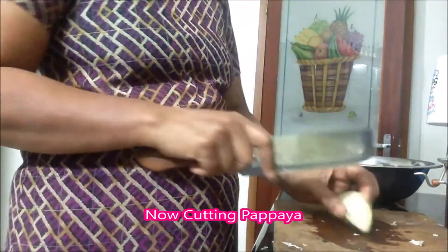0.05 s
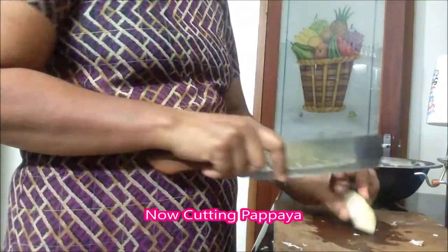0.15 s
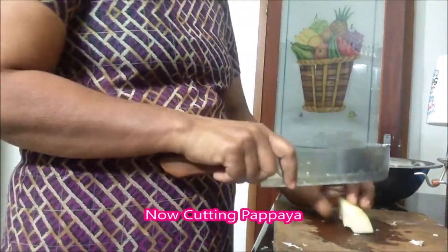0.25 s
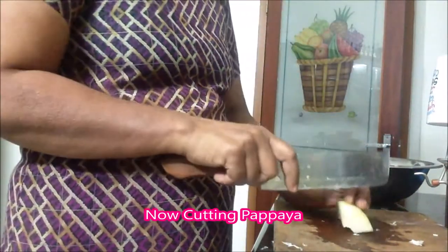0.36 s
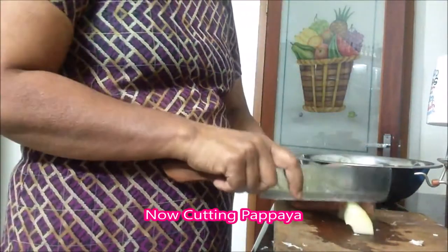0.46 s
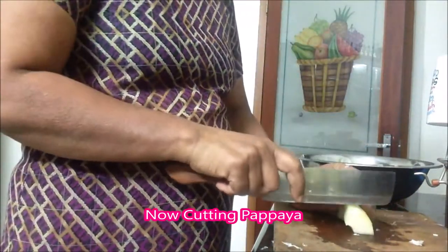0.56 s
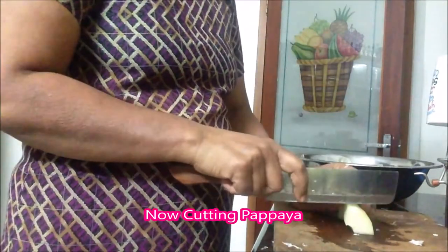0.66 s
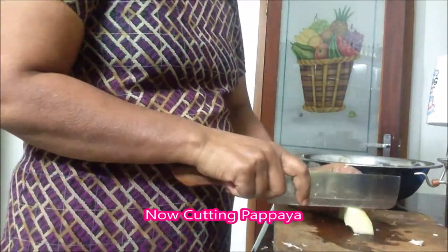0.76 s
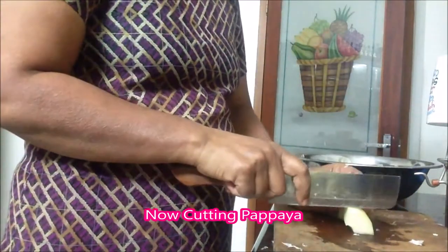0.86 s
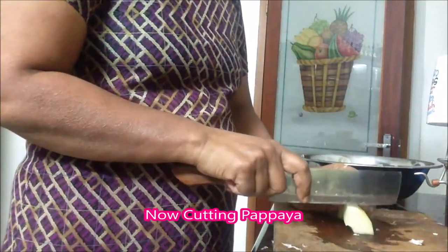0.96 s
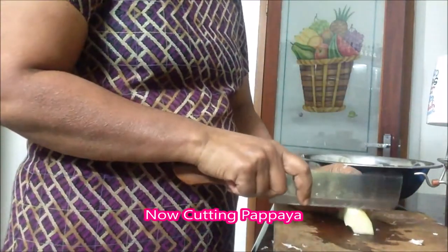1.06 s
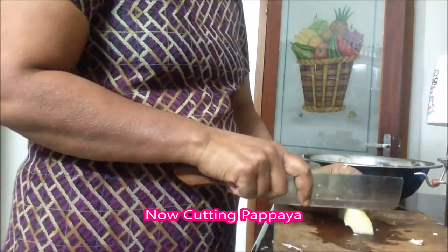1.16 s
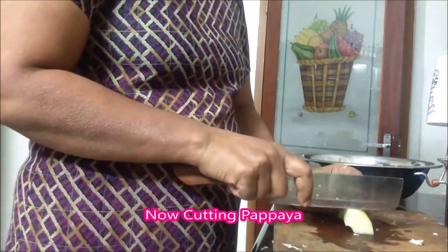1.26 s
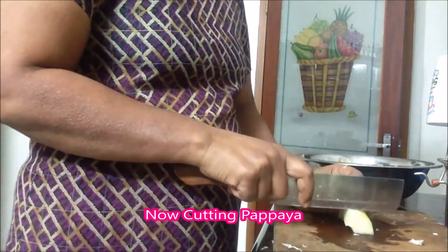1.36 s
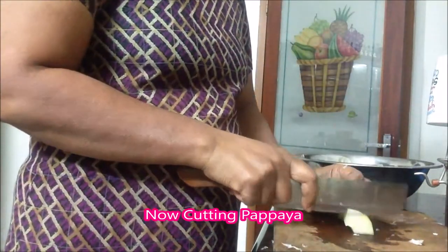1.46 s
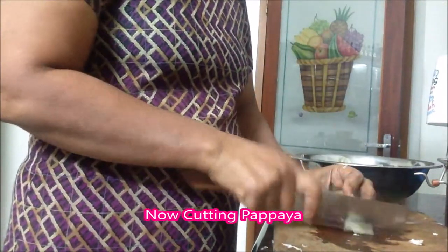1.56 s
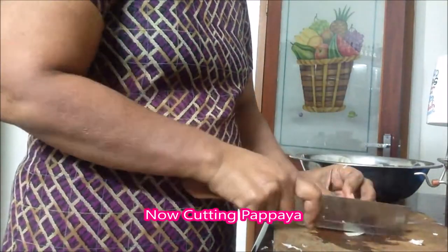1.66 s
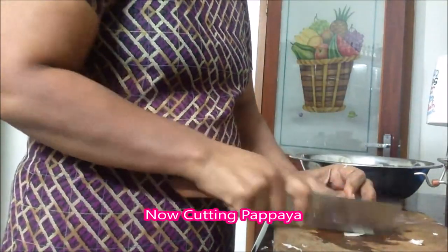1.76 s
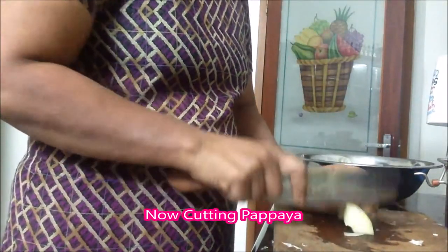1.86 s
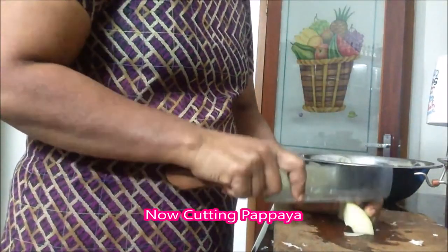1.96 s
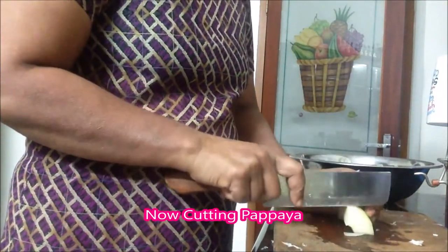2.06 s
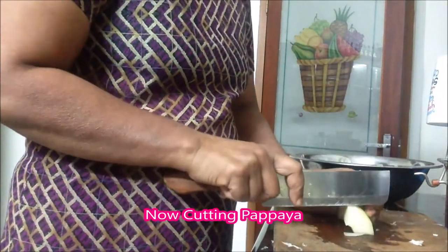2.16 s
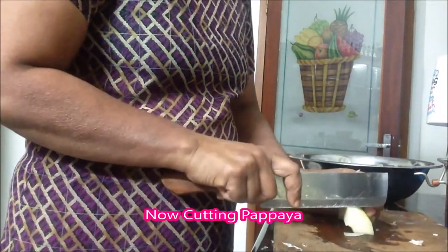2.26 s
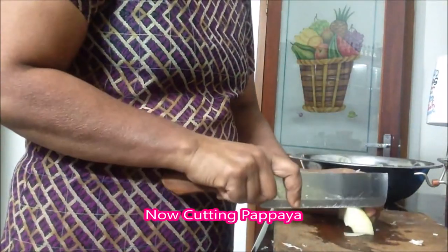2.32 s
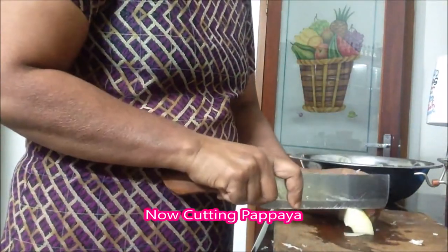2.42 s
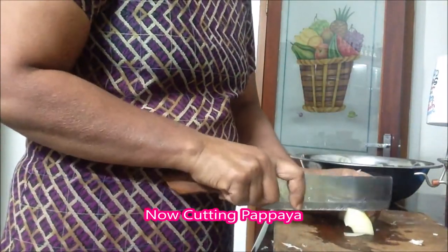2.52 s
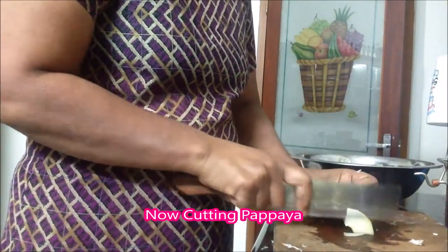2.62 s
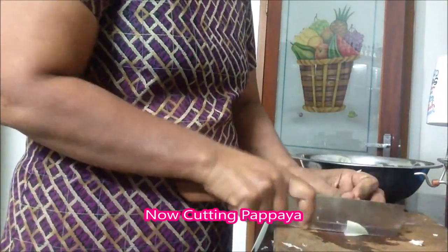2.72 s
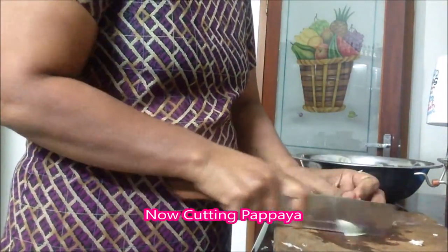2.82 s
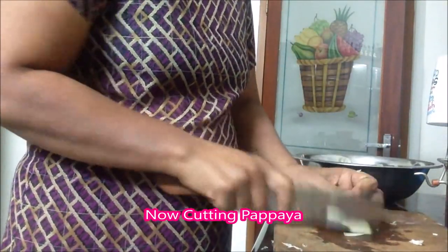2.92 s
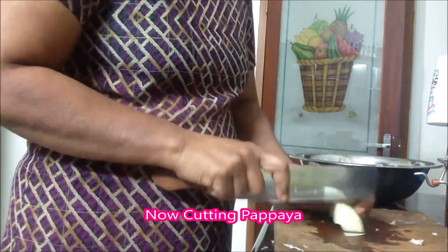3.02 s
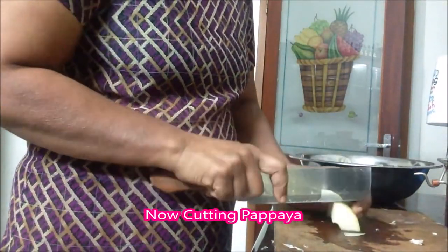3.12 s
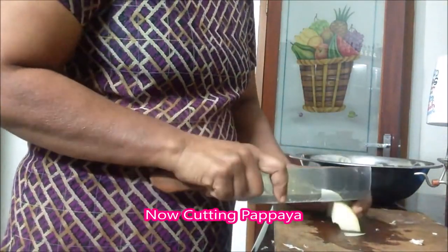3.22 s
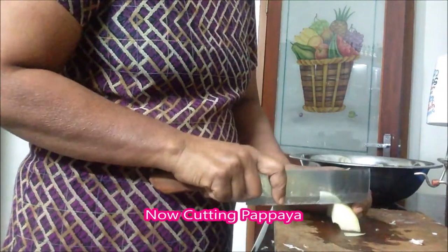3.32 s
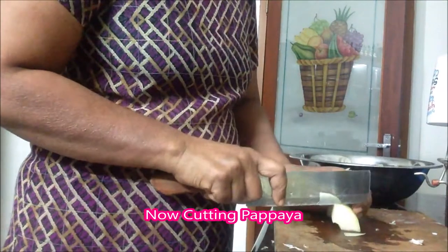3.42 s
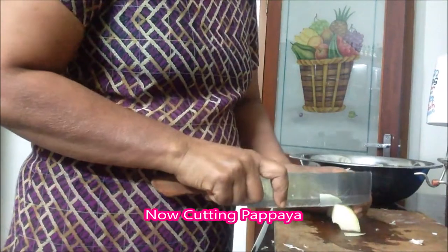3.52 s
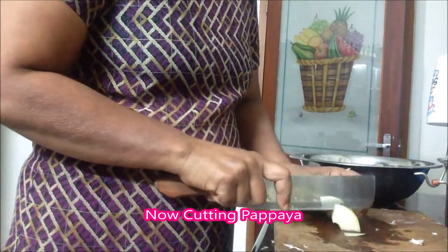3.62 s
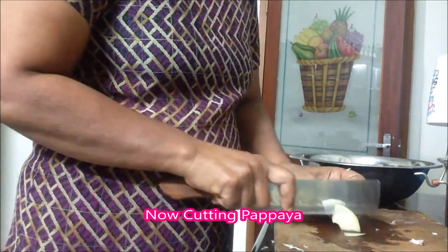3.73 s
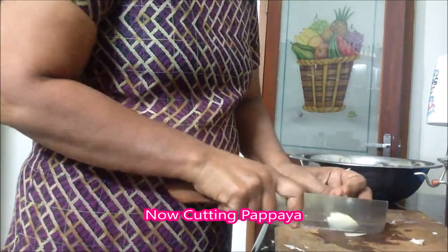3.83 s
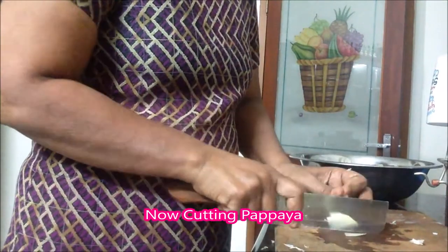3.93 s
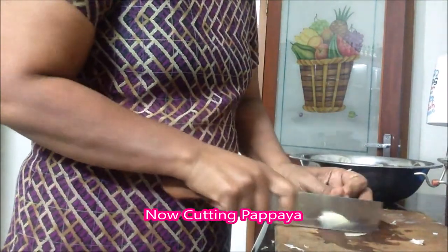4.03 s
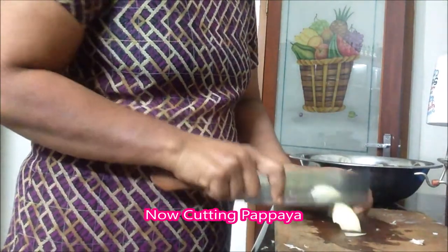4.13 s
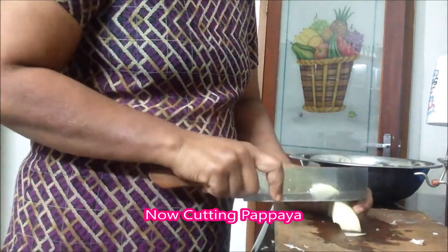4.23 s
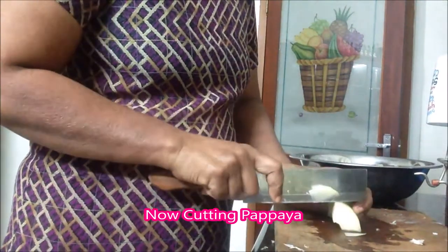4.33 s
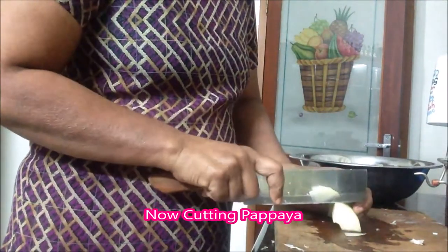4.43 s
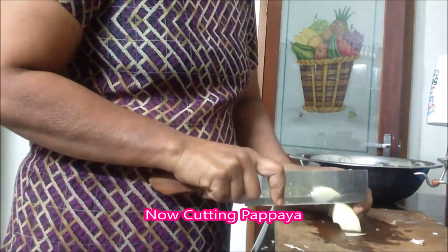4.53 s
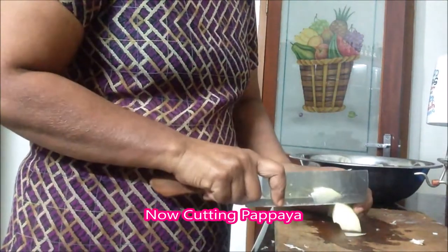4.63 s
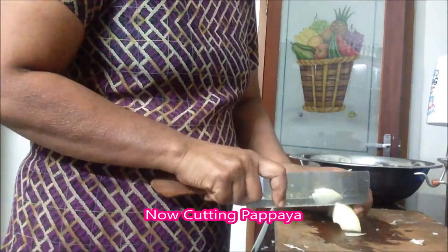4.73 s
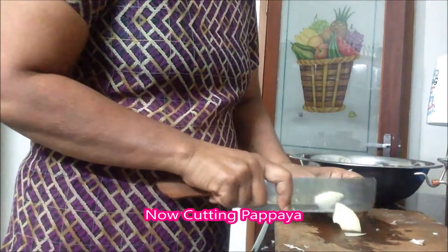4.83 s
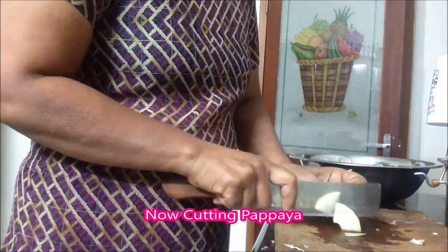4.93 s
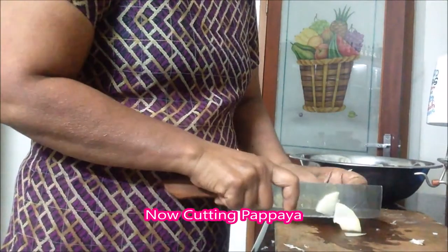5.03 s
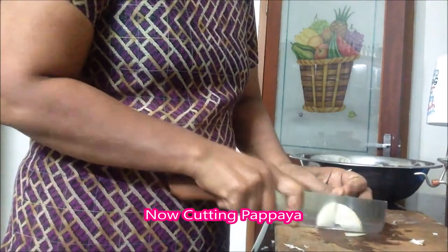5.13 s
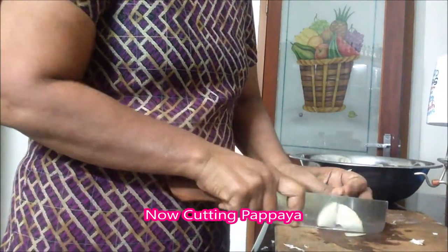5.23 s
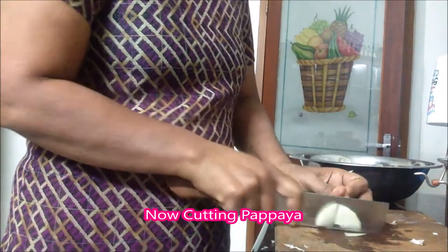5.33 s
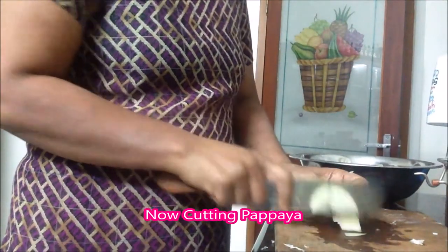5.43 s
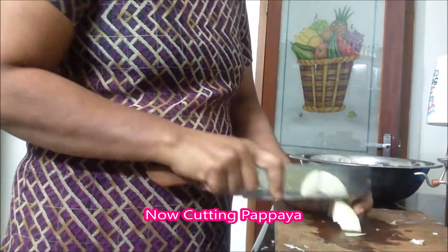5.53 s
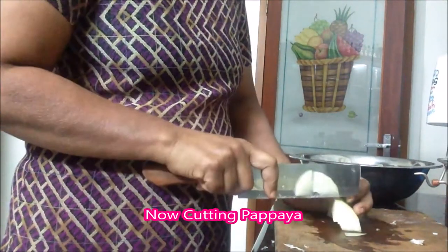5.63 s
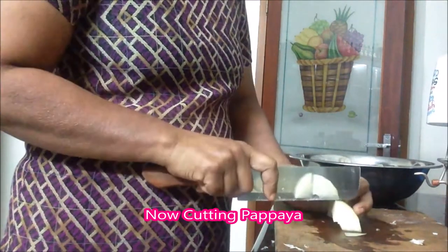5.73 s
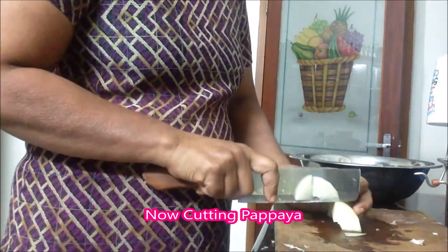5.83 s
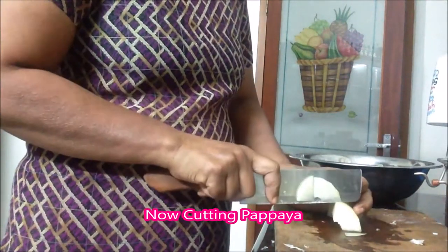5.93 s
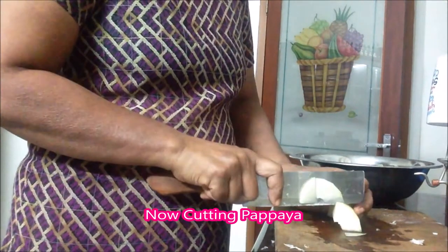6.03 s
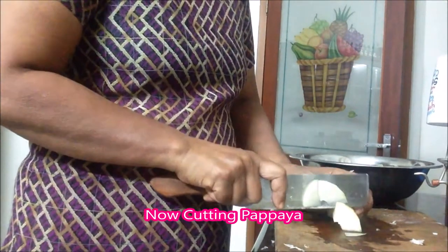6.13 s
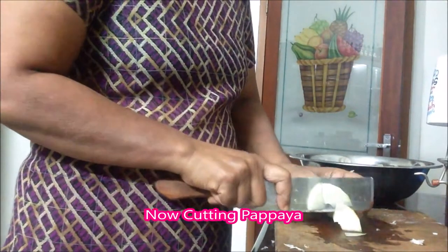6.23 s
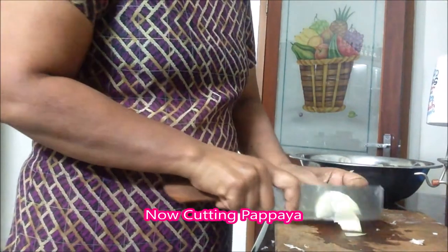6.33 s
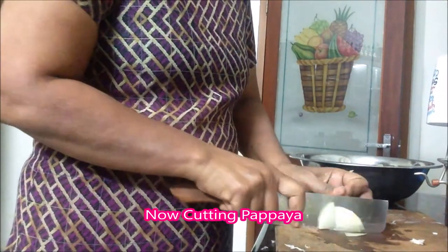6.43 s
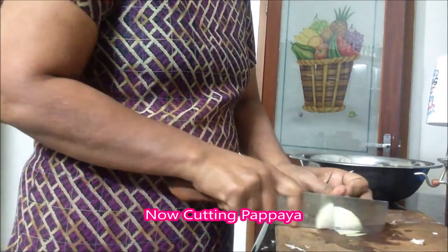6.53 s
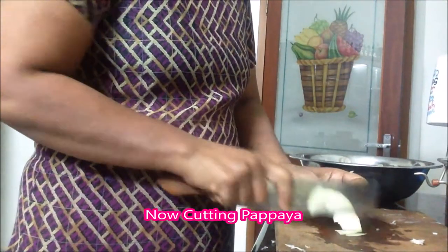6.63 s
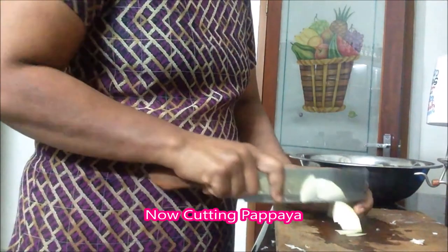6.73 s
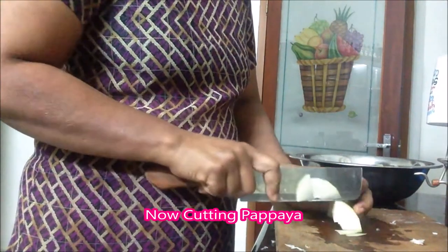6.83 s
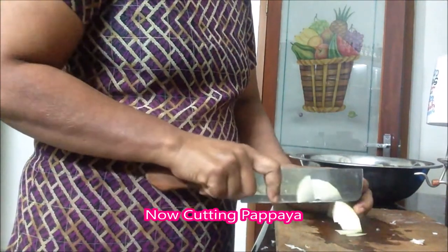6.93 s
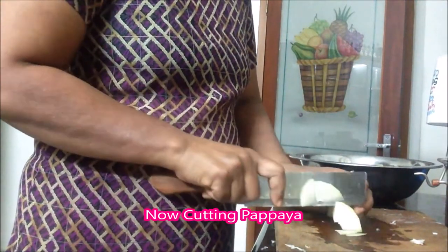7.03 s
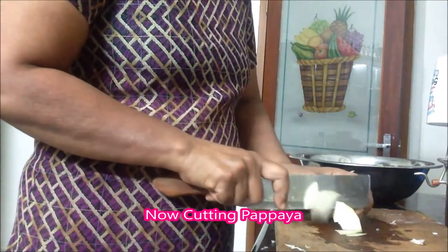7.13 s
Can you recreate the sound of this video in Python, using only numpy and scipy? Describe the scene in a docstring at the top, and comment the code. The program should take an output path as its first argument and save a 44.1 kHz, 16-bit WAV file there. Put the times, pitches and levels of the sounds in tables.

```python
"""A broad knife cuts slices off firm raw fruit on a wooden board in a hard-walled kitchen.
Each chop knocks the board in two quick touches, ringing its modes; the walls echo every knock alike.
Before it the blade hisses through the flesh: grainy, coloured noise that grows with depth.
Soft slides, light knocks and small wet ticks come between the chops.
A quiet room tone of shaped noise and a wavering low hum lie underneath."""
import sys
import numpy as np
from scipy import signal
from scipy.fft import rfft, irfft
from scipy.io import wavfile
from scipy.ndimage import uniform_filter1d

SR = 44100
rng = np.random.default_rng(int(sys.argv[2]) if len(sys.argv) > 2 else 0)


def master(y):
    """Save y as 16-bit WAV."""
    cut = np.clip(np.atleast_2d(y).T, -1, 1)
    pcm = np.round(cut * 32767)  # scale
    wavfile.write(sys.argv[1], SR, pcm.astype(np.int16))


N = 316197  # length in samples
HZ = np.fft.rfftfreq(N, 1 / SR) + 1  # the added 1 Hz keeps the logarithm finite

# The blade meets the board. Each row: full blow in seconds, level in dB, contact time in ms,
# lead of the first touch in ms, first touch in dB relative to the blow, then dB offsets of the
# thud, hollow, upper and top modes, and the crack in dB.
CHOPS = [(1.6618, -2, 0.05, 1.624, -14, -2.5, -1, -3, -2.5, -12.5),
         (2.7896, 1, 0.042, 1.262, -19, -3.5, -2.5, 3, 0.5, -11.5),
         (3.9247, 2, 0.027, 1.07, -14.5, -3.5, -5.5, 5, 3.5, -2.5),
         (5.2290, -5, 0.029, 1.886, 4.5, -2, -2, 5.5, 4.5, -9),
         (6.5024, 0.5, 0.034, 1.2, -22, -1, -3, 8, 8.5, -6.5)]


def undb(db):
    """Turn decibels into an amplitude factor."""
    return 10 ** (np.asarray(db) / 20)


def level(x, db):
    """Scale x to an RMS level in dB."""
    return x * undb(db) / np.sqrt(np.mean(x ** 2))


def add(track, s, sound):
    """Lay a short sound onto a track, starting at s seconds."""
    i = int(s * SR)
    track[i:i + len(sound)] += sound[:N - i]


def coloured(table, x):
    """Filter x by a curve through (Hz, dB) points, straight over log frequency."""
    hz, db = np.transpose(table)
    gain = undb(np.interp(np.log(HZ), np.log(hz), db))
    return irfft(rfft(x) * gain, N)


def walk(rate):
    """Random levels held 1 / rate seconds and smoothed twice; spread near 1."""
    k = int(SR / rate)
    steps = np.repeat(rng.standard_normal(N // k + 1), k)
    smooth = uniform_filter1d(uniform_filter1d(steps, k), k)
    return 1.5 * smooth[:N]


def scatter(spread_ms):
    """A click smeared in time: every narrow band arrives at its own moment, none louder than the rest."""
    hz = np.fft.rfftfreq(1024, 1 / SR)
    arrivals = rng.random(size=60)
    late_s = np.interp(hz, np.linspace(0, SR / 2, num=60), arrivals) * spread_ms / 1000
    # delay is the slope of phase over frequency
    phase = 2 * np.pi * np.cumsum(late_s) * hz[1]
    return irfft(np.exp(-1j * phase))


def knock(contact_ms, thud_db, hollow_db, upper_db, top_db):
    """One touch rings the board modes; a longer contact is duller. Peak 1."""
    # Modes of the wooden board. Each row: frequency in Hz, level in dB, 60 dB decay time in seconds.
    board_modes = [(208, -21.5, 0.045), (239, -16.5, 0.029), (529, -20, 0.027), (751, -16, 0.035),
                   (1053, -4.5, 0.023), (1305, -2.5, 0.015), (1625, 0, 0.0085), (2174, -3.5, 0.009),
                   (2534, 1.5, 0.012), (2661, 2, 0.008), (3106, -1, 0.0068), (3680, -8, 0.012),
                   (4230, -7.5, 0.0094), (4830, -6.5, 0.0083), (5370, -7.5, 0.0051), (6373, -9, 0.0058),
                   (7530, -11, 0.0039), (8300, -19, .0025)]
    thud_hz, hollow_hz, body_hz, upper_hz = 650, 1200, 1900, 4000  # upper edges of the mode groups
    t = np.arange(4096) / SR
    hz, db, t60 = np.transpose(board_modes)[:, :, None]
    # where the blade lands decides which groups of modes speak
    groups = [hz < thud_hz, hz < hollow_hz, hz < body_hz, hz < upper_hz]
    db = db + np.select(groups, [thud_db, hollow_db, 0, upper_db], top_db)
    signs = (-1) ** np.arange(len(board_modes))[:, None]
    decay = np.exp(-np.log(1000) * t / t60)
    ring = np.sum(signs * undb(db) * np.sin(2 * np.pi * hz * t) * decay, axis=0)
    push = t * np.exp(-1000 * t / contact_ms)
    out = signal.fftconvolve(ring, push)[:len(t)]
    return out / np.abs(out).max()


def board():
    """Chops of two touches with a short crack of the last fibres, then the light knocks and a set-down."""
    # The flesh gives way with a light knock. Each row: time in seconds, level in dB, brightness in dB.
    gives = [(1.651, -45, -5), (2.766, -38, 2), (2.777, -40, 3.5), (3.9012, -35, 6.5), (5.2040, -29.5, 6.5),
             (6.478, -39.5, 9)]
    give_contact_ms = 0.065
    roll_hz, roll_ms, roll_db = 3950, 2.419, 0.5  # modes above roll_hz are smeared over roll_ms
    crack_ms = 6.5
    margin = 96  # samples of silence around a knock, for the two-way filter
    out = np.zeros(N)
    fibres = signal.butter(1, [4200, 11000], "band", fs=SR, output="sos")
    split = signal.butter(6, roll_hz, fs=SR, output="sos")
    for s, db, contact_ms, lead_ms, first_db, *groups_db, crack_db in CHOPS:
        first_s = s - lead_ms / 1000
        whole = np.pad(knock(contact_ms, *groups_db), margin)
        blow = signal.sosfiltfilt(split, whole)
        add(out, s - margin / SR, undb(db) * blow)
        add(out, first_s - margin / SR, undb(db + first_db) * blow)
        # the edge rolls down along its length: the high modes are set off one after another,
        # not in two clean touches
        both = np.hypot(1, undb(first_db))
        rolled = signal.fftconvolve(whole - blow, scatter(roll_ms))
        add(out, first_s - margin / SR, undb(db + roll_db) * both * rolled)
        crack = signal.sosfilt(fibres, scatter(crack_ms))
        add(out, first_s, undb(crack_db) * crack)
    for s, db, bright_db in gives:
        light = knock(give_contact_ms, -bright_db, -bright_db / 2, bright_db, bright_db)
        add(out, s, undb(db) * light)
    # one dull set-down: long contact, strong thud modes
    set_down = knock(contact_ms=1.0, thud_db=20, hollow_db=0, upper_db=0, top_db=0)
    add(out, 0.2732, undb(-37.5) * set_down)
    # the knocks carry no deep bass
    return signal.sosfilt(signal.butter(2, 130, "high", fs=SR, output="sos"), out)


def strokes(t):
    """Gain and brightness of every cut, louder with depth until the last tear, and of every slide."""
    # The blade goes through the flesh, one cut per chop. Each row: start in seconds, level at the
    # end in dB, rise in dB, brightness in dB, last tear in dB, lead of the tear on the chop in ms.
    cuts = [(1.575, -55, 17, -5, -55, 14), (2.60, -54, 18, -1.5, -53, 11),
            (3.77, -52, 16.5, -2, -44.5, 8.8), (5.205, -42.5, 5, -2.5, -41.5, 4),
            (6.33, -50.5, 15, 4, -39.5, 9.5)]
    # Blade and fingers slide over the wet flesh. Each row: start in seconds, hold in seconds,
    # level in dB, brightness in dB.
    slides = [(.11, .1, -76, -7), (0.69, 0.23, -72.5, 11), (1.504, 0.04, -69.5, 3), (3.42, 0.18, -73.5, 2),
              (3.72, 0.025, -72.5, -7), (4.868, 0.094, -60.5, -3.5), (5.897, .2, -79.5, -1.5),
              (6.16, 0.12, -65.5, 2.5), (7.115, .1, -61, 14)]
    tear_rise_ms, tear_fall_ms = 5.4, 2
    entry_db_s, attack_db_s, release_db_s = 900, 497.5, 139  # slopes in dB per second
    for (start, db, rise_db, bright_db, tear_db, lead_ms), (chop, *_) in zip(cuts, CHOPS):
        ms = 1000 * (t - chop) + lead_ms  # time from the tear
        stop = np.exp(-(np.maximum(ms, 0) / tear_fall_ms) ** 2)
        # louder the deeper the blade goes, then the last flesh tears at once
        depth = np.clip((t - start) / (chop - lead_ms / 1000 - start), 0, 1)
        entry_db = entry_db_s * np.maximum(start - t, 0)
        press = undb(db - rise_db * (1 - depth) - entry_db)
        tear = undb(tear_db) * np.exp(np.minimum(ms, 0) / tear_rise_ms)
        yield stop * (press + tear), bright_db
    for start, hold, db, bright_db in slides:
        before_db = attack_db_s * np.maximum(start - t, 0)
        after_db = release_db_s * np.maximum(t - start - hold, 0)
        yield undb(db - before_db - after_db), bright_db


def rubbing():
    """Grainy hiss of tearing cells; a brighter stroke carries less of the low part."""
    # Colour of the hiss. Each row: frequency in Hz, level in dB.
    rub_colour = [(500, -6), (1200, -1), (2500, -2), (4500, -2), (6500, -8.5), (7700, -2), (9500, -9),
                  (13500, -4), (16000, -8.5)]
    noise = rng.standard_normal(N)
    grain_db = 1.8 * rng.exponential(size=N) + 1.1 * walk(60) + 1.7 * walk(14)
    hiss = level(coloured(rub_colour, noise * undb(grain_db)), 0.1)
    low = signal.sosfilt(signal.butter(1, 4000, fs=SR, output="sos"), hiss)
    high = hiss - low
    out = np.zeros(N)
    for gain, bright_db in strokes(np.arange(N) / SR):
        out += gain * (low * undb(-bright_db) + high)
    return out


def ticks():
    """Each small wet tick is a sine burst that dies within a few cycles."""
    # Each row: time in seconds, level in dB before the decay, pitch in Hz.
    wet_ticks = [(.276, -47, 9000), (0.806, -41, 8200), (2.1222, -46, 9000), (3.7205, -54, 9000),
                 (5.833, -53, 13000), (5.906, -52, 9000)]
    out = np.zeros(N)
    t = np.arange(200) / SR
    for s, db, hz in wet_ticks:
        burst = np.sin(2 * np.pi * hz * t) * np.exp(-t * hz / 0.81)
        add(out, s, undb(db) * burst)
    return out


def kitchen():
    """Echo pattern of the room: direct path, single echoes, then a dense tail that dies band by band."""
    # Decay between the hard walls. Each row: frequency in Hz, 60 dB decay time in seconds.
    walls = [(150, 0.1), (400, 0.48), (1040, 0.63), (2760, 0.52), (5000, 0.47), (8000, 0.44), (13000, 0.26)]
    # Room modes that ring above the rest of the tail. Each row: frequency in Hz, level in dB,
    # 60 dB decay time in seconds.
    rings = [(1066, -56, .65), (1155, -55, .65), (1245, -53, .65), (1331, -51, .65), (1547, -48, .65),
             (2417, -48, .6), (2596, -52, .6), (2815, -52, .6), (3125, -55, .55)]
    # First echoes from near surfaces. Each row: delay in ms, level in dB.
    first_echoes = [(4.8, -8.5), (10.2, -5), (14.7, -8.5), (21, -9), (27.5, -13), (31, -12.5)]
    wall_db, build_up_s = 1.5, 0.013
    late_db, late_stretch = -13.5, 1.866
    t = np.arange(SR) / SR
    hz, t60 = np.transpose(walls)
    tail = 0
    for centre in 125 * 2 ** np.arange(0, 7.1, .25):  # quarter-octave bands
        edges = [centre / 2 ** .125, centre * 2 ** .125]
        band = signal.butter(2, edges, "band", fs=SR, output="sos")
        fall = np.log(1000) * t / np.interp(np.log(centre), np.log(hz), t60)
        # the rooms next door hand some sound back later
        decay = np.exp(-fall) + undb(late_db) * np.exp(-fall / late_stretch)
        tail = tail + signal.sosfiltfilt(band, rng.standard_normal(SR)) * decay
    build_up = 1 - np.exp(-(t / build_up_s) ** 2)
    dense = build_up * tail
    path = dense * undb(wall_db) / np.sqrt(np.sum(dense ** 2))
    for (ring_hz, db, ring_s), turn in zip(rings, rng.random(len(rings))):
        ring = np.sin(2 * np.pi * (ring_hz * t + turn)) * np.exp(-np.log(1000) * t / ring_s)
        path += build_up * undb(db) * ring
    echoes = np.zeros(SR)
    for ms, db in first_echoes:
        echoes[int(ms * SR / 1000)] = undb(db)
    # rough surfaces scatter the treble of an echo
    path += signal.sosfilt(signal.butter(1, 6500, fs=SR, output="sos"), echoes)
    path[0] = 1  # direct path
    return path


def background():
    """Room tone that swells a little and favours the room modes, and a low hum that comes and goes."""
    # Colour of the room tone. Each row: frequency in Hz, relative level in dB per Hz.
    tone_colour = [(15, -77.5), (25, -21), (48, -23), (127, -6), (185, -3), (212, -7), (301, -2.5),
                   (405, -5), (624, -11.5), (1440, -17.5), (5280, -35), (14000, -44.5), (16000, -55.5)]
    # Room modes that stand out of the tone. Each row: frequency in Hz, width in Hz, peak in dB.
    tone_modes = [(63.4, 9, 11.5), (105, 6.4, 9), (129, 4, 7), (144, 9.7, 4.5), (196, 9, 6), (246, 33, 3.5),
                  (301, 1.3, 7)]
    # The hum swells. Each row: loudest moment in seconds, level in dB, width in seconds.
    hum_swells = [(2.25, -69.5, .35), (4.98, -55, .2), (5.66, -62, .2)]
    tone_db, hum_rest_db, hum_hz = -53.5, -90, 63
    modes = 1
    for hz, width, db in tone_modes:
        modes = modes + (undb(db) - 1) / (1 + (2 * (HZ - hz) / width) ** 2)
    tone = coloured(tone_colour, irfft(rfft(rng.standard_normal(N)) * modes, N))
    wavering_hz = hum_hz * (1 + 0.014 * walk(3))
    hum = np.sqrt(2) * np.sin(2 * np.pi * np.cumsum(wavering_hz) / SR)  # RMS 1
    t = np.arange(N) / SR
    swell = undb(hum_rest_db)
    for s, db, width in hum_swells:
        swell = swell + undb(db) * np.exp(-((t - s) / width) ** 2)
    return level(tone * undb(.5 * walk(4.7)), tone_db) + hum * swell


def scene():
    """Knocks fill the room fully; the faint close sounds are mostly direct."""
    close = rubbing() + ticks()
    into_room = board() + undb(-8.0) * close
    wet = signal.fftconvolve(into_room, kitchen())[:N]
    return (wet + close + background())[None]


def record(dry):
    """The microphone droops in the top octave, rounds the loudest peaks and cuts the deep bass and the top."""
    droop = signal.sosfilt(signal.butter(2, 14500, fs=SR, output="sos"), dry)
    rounded = droop / (1 + (np.abs(droop) / .96) ** 6) ** (1 / 6)
    no_bass = signal.sosfilt(signal.butter(2, 42, "high", fs=SR, output="sos"), rounded)
    # steep top cut at 15.3 kHz
    return signal.sosfilt(signal.ellip(10, .2, 70, 15300, fs=SR, output="sos"), no_bass)


dry = scene()
out = record(dry)
master(out)
```